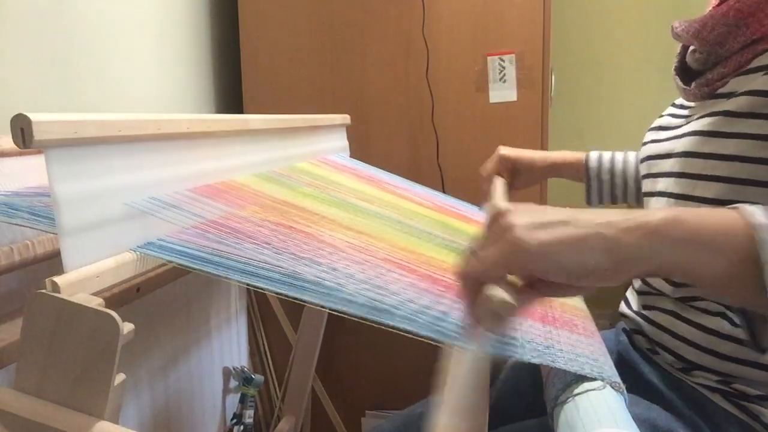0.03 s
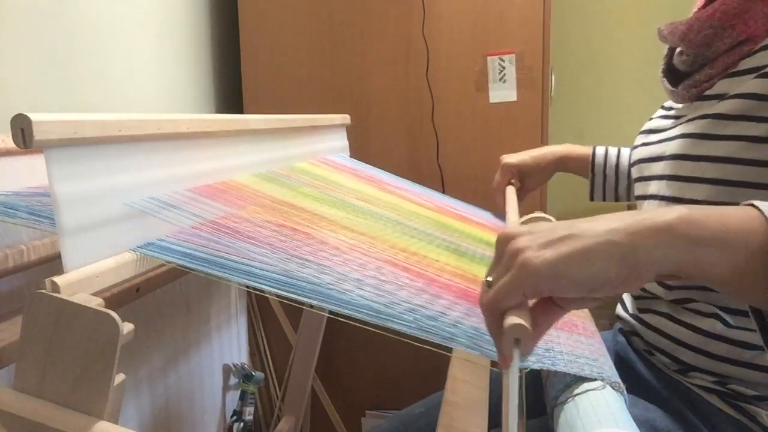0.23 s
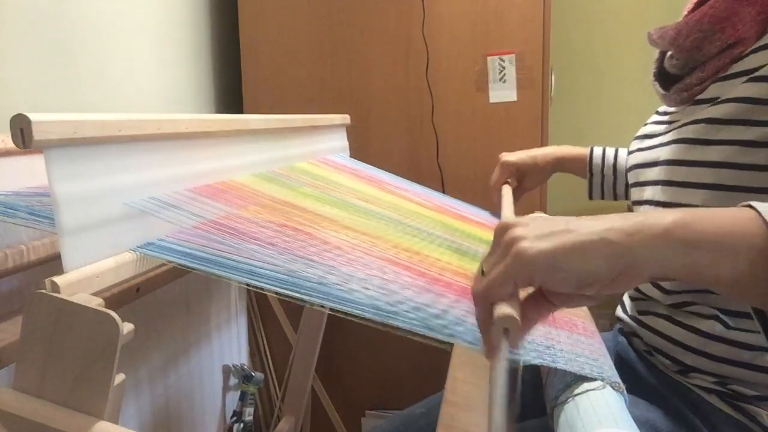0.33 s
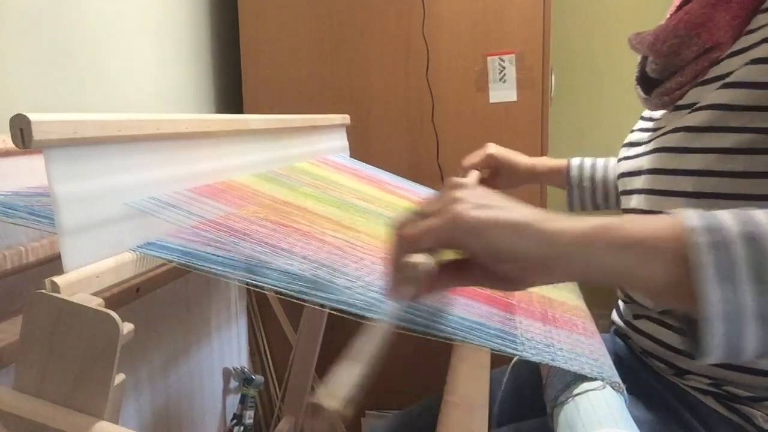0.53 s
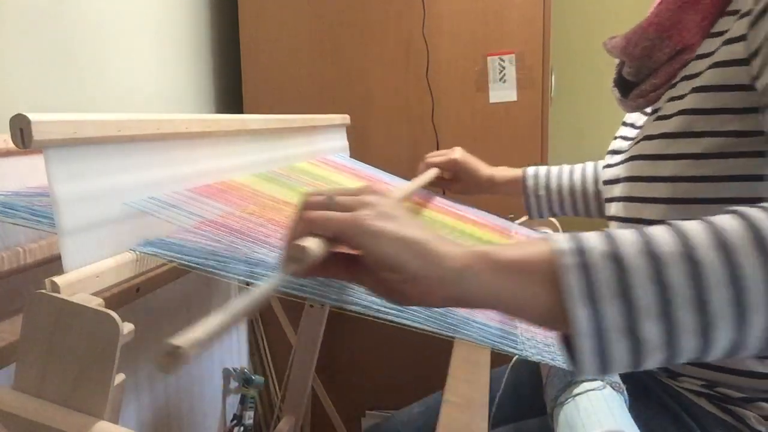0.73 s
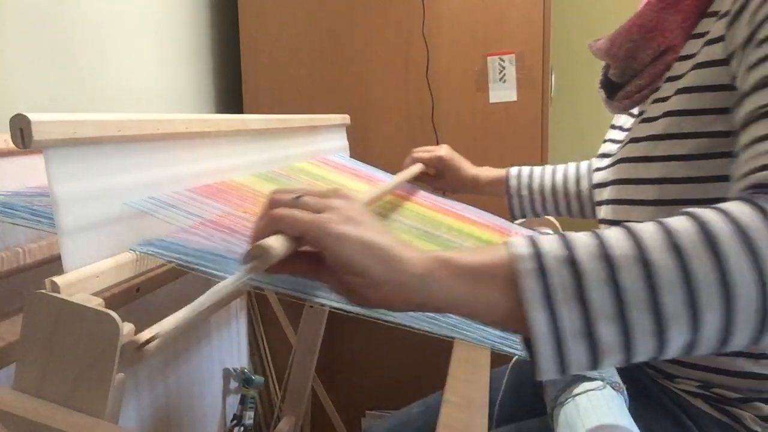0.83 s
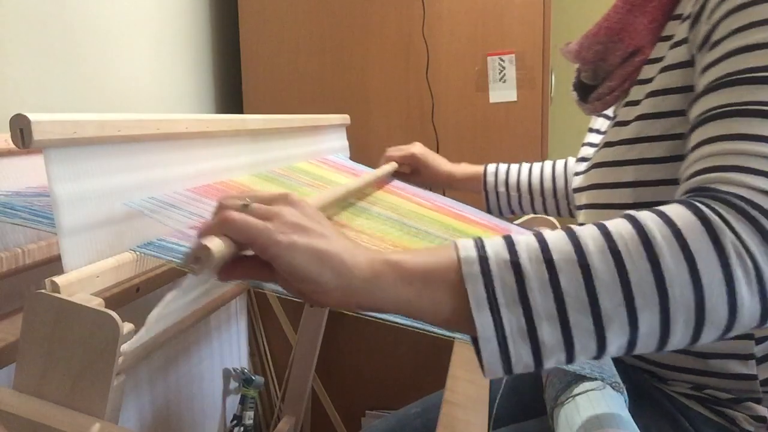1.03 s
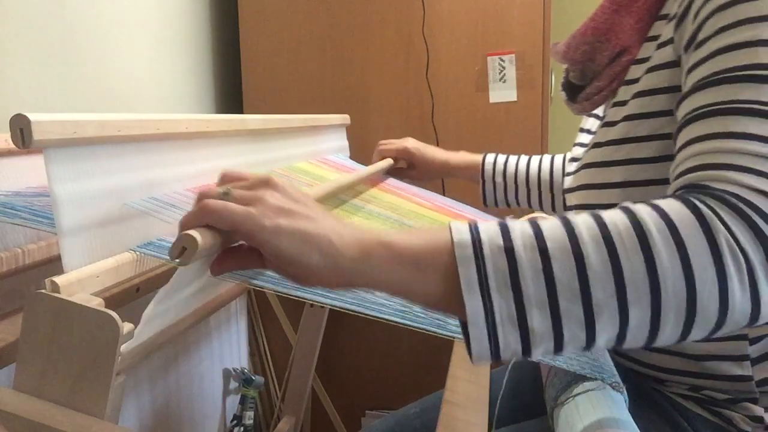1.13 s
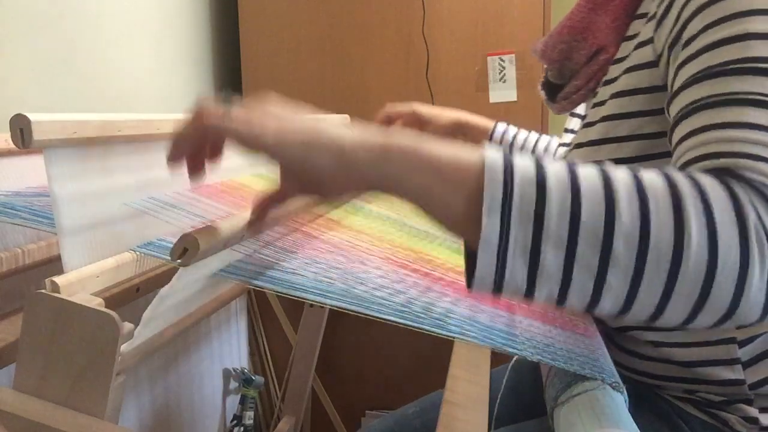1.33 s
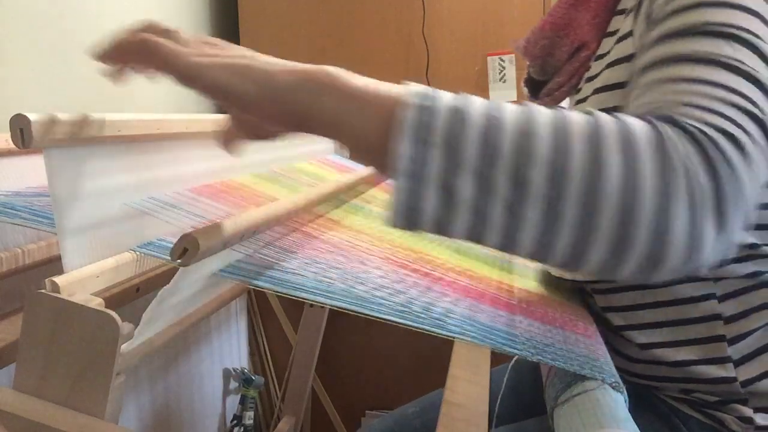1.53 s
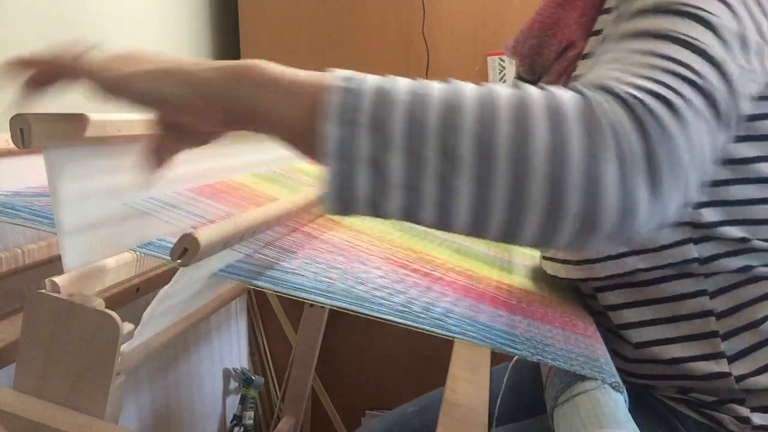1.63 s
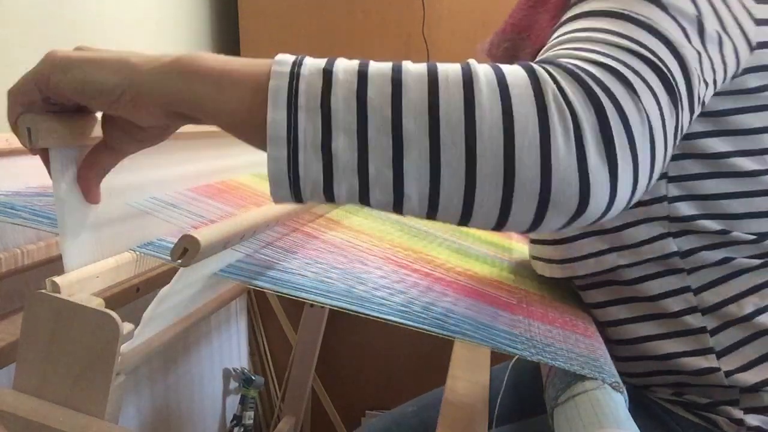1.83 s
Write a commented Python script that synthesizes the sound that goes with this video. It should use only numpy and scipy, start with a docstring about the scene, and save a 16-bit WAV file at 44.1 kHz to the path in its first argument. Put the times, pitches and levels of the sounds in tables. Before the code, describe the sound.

A small wooden loom's reed rubs along threads with a soft, grainy hiss. At about 0.25 seconds it clicks and thumps against the cloth, and the frame booms and rattles. The reed slides back, then knocks several times into its rests from 1 to 1.2 seconds, with faint squeaks and a softer boom. Another faint squeak and two light taps come around 1.7 to 1.9 seconds. The room is quiet.

```python
"""A soft, grainy hiss opens the sound: the reed (the comb) of a small wooden loom rubs along the threads.
Its slats click as it thumps against the cloth, the frame booms and rattles, and the reed slides back.
Its bar knocks into the rests and settles with faint squeaks. One more squeak and two light taps
follow as the hand grips the next bar. The room is quiet, with a short, dull echo."""
import sys
import numpy as np
from scipy import signal
from scipy.io import wavfile

SR = 44100
rng = np.random.default_rng(int(sys.argv[2]) if len(sys.argv) > 2 else 0)


def generate_wav(sig):
    """Save sig (samples, or channels by samples) to the path in sys.argv[1] as 16-bit PCM at SR."""
    pcm = np.round(np.clip(np.atleast_2d(sig).T, -1, 1) * 32767).astype(np.int16)
    wavfile.write(sys.argv[1], SR, pcm)


N = 83790
TIME = np.arange(N) / SR

# Levels are relative. A fade time (T60) is how long a sound takes to fall by 60 dB.
# The reed's slats click. Each row: start in seconds, level in dB.
SLAT_CLICKS = [(0.236, -27.5), (0.2546, -24), (0.2806, -33)]
# The notes the slats ring with. Each row: pitch in Hz, level in dB, fade time in seconds.
SLAT_NOTES = [(6450, -1.5, 0.025), (6180, -4, 0.024), (6560, -5.5, 0.019), (8530, -8.5, 0.014)]
# The noise in a click. Each row: frequency in Hz, level in dB.
CLICK_SPECTRUM = [(1000, -22), (3200, -5), (5000, -8), (6500, 1.5), (8000, -15), (11000, -8.5),
                  (15000, -34.5)]

# Soft blows on the frame. Each row: start in seconds, level in dB.
FRAME_THUMPS = [(0.2364, -48), (0.2631, -32.5), (0.2784, -27), (1.166, -44.5), (1.1976, -51), (1.318, -70)]
# The notes the frame rings with. Each row: pitch in Hz, level in dB, fade time in seconds.
FRAME_NOTES = [(45.2, -42.5, 1.95), (86.4, -21.5, 1.55), (128, -15, 0.23), (238, -16, 1.12),
               (299.5, -6, 0.31), (334.7, -13, 0.66), (381.2, -19, 0.77), (414.3, -5.5, 0.14),
               (463, -22.5, 0.52), (581, -22.5, 0.5), (664, -26, 0.66), (833, -15.5, 0.15)]
# The frame's main note swells. Each row: start in seconds, level in dB, hold in seconds.
FRAME_BOOMS = [(0.267, -28, 0.089), (1.173, -36, 0.01)]
# The frame shudders under load. Each row: start in seconds, level in dB, hold in seconds.
FRAME_SHUDDERS = [(-.02, -54, 0.069), (0.225, -40.5, 0.0067), (0.261, -38.5, 0.085), (1.03, -53, 0.06),
                  (1.141, -43, 0.061), (1.313, -71, 0.015)]
# The noise in a shudder. Each row: frequency in Hz, level in dB.
SHUDDER_SPECTRUM = [(22, 2), (32, -32.5), (50, 6), (85, -9.5), (140, -2), (300, 1.5), (500, -14),
                    (900, -12), (1600, -30), (4000, -52)]

# Wood knocks on wood. Each row: start in seconds, level in dB, treble limit in Hz,
# level of the ringing in dB, fade time of the crack in seconds.
BAR_KNOCKS = [(0.2291, -31, 3500, -13, 0.081), (0.471, -48, 2900, -19, 0.15),
              (0.554, -48.5, 7000, -20, 0.044), (0.9606, -34, 2220, 1, 0.15),
              (1.0098, -37, 2960, -12.5, 0.12), (1.106, -35.5, 3420, 1.5, 0.18),
              (1.1288, -31, 5500, -12, 0.075), (1.1625, -37.5, 4860, -1.5, 0.11)]
# The notes the bar rings with. Each row: pitch in Hz, level in dB, fade time in seconds.
BAR_NOTES = [(166.6, -27, 0.82), (323.4, -11, 0.32), (479, -18, 0.41), (661, -20.5, 0.29), (987, 1.5, 0.12),
             (1059, -9.5, 0.084), (1640, -29, 0.127), (1994, -8.5, 0.11), (2326, -15, 0.047),
             (2995, -31, 0.024)]
# The noise in a knock. Each row: frequency in Hz, level in dB.
KNOCK_SPECTRUM = [(150, -16), (350, -2), (700, -10), (1100, 4), (2200, -3), (3500, -3), (4800, -13),
                  (6000, -7), (7500, -37), (15000, -16.5)]

# The faster the reed slides, the louder it rubs. Each row: time in seconds, level in dB.
RUB_LEVELS = [(0, -56), (.034, -53.5), (.092, -54), (.144, -69.5), (.19, -45.5), (.235, -43), (.29, -43.5),
              (.362, -52), (.422, -77), (.48, -61), (.55, -53.5), (.664, -52.5), (.782, -55), (.938, -62.5),
              (1.0, -57), (1.05, -120)]
# The hiss of the threads. Each row: frequency in Hz, level in dB.
RUB_SPECTRUM = [(60, -19), (160, -3), (260, -4.5), (380, -4), (650, -16), (1300, 1), (2200, 1), (3600, 1.5),
                (5000, -7), (7000, -10.5), (10000, -18), (15000, -19)]
# How bright the hiss is. Each row: time in seconds, treble slope in dB per octave.
RUB_BRIGHTNESS = [(0, -1.5), (.06, 2.5), (.2, 0.5), (.27, 0.5), (.36, -13), (.46, -3.5), (.56, 2), (.68, 0),
                  (.8, -8), (.95, -2)]

# The hand taps. Each row: start in seconds, level in dB, treble limit in Hz, level of the ringing in dB.
HAND_TAPS = [(1.8009, -44.5, 7740, -0.5), (1.8802, -42.5, 3500, -15)]
# The notes the next bar rings with. Each row: pitch in Hz, level in dB, fade time in seconds.
NEXT_BAR_NOTES = [(398, -17, 0.21), (1138, -6, 0.053), (2277, 5.5, 0.023), (2595, -3, 0.033),
                  (3390, -1.5, 0.03), (6100, -17, 0.035)]
# The noise in a tap. Each row: frequency in Hz, level in dB.
TAP_SPECTRUM = [(100, -10), (300, -3.5), (700, -2), (1100, 0.5), (2400, -6), (4500, -3.5), (6000, -2.5),
                (9000, -10.5), (15000, -10)]

# Loose parts chatter after the beat. Each row: start in seconds, level in dB, fade time in seconds.
LOOSE_RATTLES = [(0.249, -45.5, 0.86), (1.167, -39.5, 0.1)]
# Where the rattling wood rings. Each row: pitch in Hz, level in dB, width in Hz.
RATTLE_BANDS = [(570, 0, 94), (845, -3, 170), (1139, 3, 290), (1533, -5.5, 81), (1967, -6, 150)]
# Wood squeaks. Each row: loudest moment in seconds, level in dB, pitch in Hz, width in Hz,
# rise time in seconds, fade time in seconds.
WOOD_SQUEAKS = [(1.016, -64, 7150, 2300, 0.011, 0.16), (1.078, -54, 5850, 2000, 0.017, 0.21),
                (1.066, -71.5, 12000, 2200, 0.028, .25), (1.691, -64, 4170, 400, 0.0064, 0.31)]
# The quiet room's own noise. Each row: frequency in Hz, level in dB.
ROOM_SPECTRUM = [(22, -18.5), (32, -3), (48, 9), (80, 2), (150, -1.5), (300, -5), (600, -5.5), (1050, -1),
                 (1800, -4.5), (2600, -9.5), (4000, -13), (7000, -16), (11000, -23), (15500, -23.5)]


def slat_clicks():
    """The reed meets the cloth and its slats ring with sharp, high clicks."""
    return sum(at(start, from_db(db) * strike(SLAT_NOTES, CLICK_SPECTRUM, ring_db=-3, tick_db=-6,
                                              crack_t60=0.023, damping=0.28, rise_s=0.0004))
               for start, db in SLAT_CLICKS)


def frame_thumps():
    """Each soft blow sets the frame's low notes ringing."""
    return sum(at(start, from_db(db) * ringing(FRAME_NOTES, spread_db=2)) for start, db in FRAME_THUMPS)


def frame_boom():
    """The frame's deep main note sinks a little and dies ever faster as the hands ease off."""
    pitch_hz, sag_hz_per_s, release_s = 223.4, 31.6, 0.13
    phase = 2 * np.pi * np.cumsum(pitch_hz - sag_hz_per_s * TIME) / SR
    tone = np.sin(phase) * swell(rise_s=0.013)
    out = np.zeros(N)
    for start, db, hold in FRAME_BOOMS:
        release = np.exp(-(np.maximum(TIME - hold, 0) / release_s) ** 2)
        out += at(start, from_db(db) * tone * fade(t60=0.5, hold=hold) * release)
    return out


def frame_shudder():
    """The frame rumbles while it is pressed; above a certain pitch the rumble dies sooner."""
    bass_t60, knee_hz = 0.57, 170
    rise = swell(rise_s=0.0033)
    out = np.zeros(N)
    for hz, noise in noise_bands(SHUDDER_SPECTRUM):
        t60 = bass_t60 * min(knee_hz / hz, 1) ** 0.91
        for start, db, hold in FRAME_SHUDDERS:
            out += noise * at(start, from_db(db) * rise * fade(t60, hold))
    return out


def bar_knocks():
    """The bar knocks on the wood; each knock has its own loudness, brightness and ring."""
    out = np.zeros(N)
    for start, db, treble_hz, ring_db, crack_t60 in BAR_KNOCKS:
        knock = strike(BAR_NOTES, KNOCK_SPECTRUM, ring_db, tick_db=-2.5,
                       crack_t60=crack_t60, damping=0.32, rise_s=0.0034)
        out += at(start, from_db(db) * low_pass(knock, treble_hz))
    return out


def thread_rubbing():
    """Threads run through the reed with a fine, grainy hiss."""
    treble_from_hz, trim_db, grain_db = 3700, -1, 0.5
    slope = curve(RUB_BRIGHTNESS)
    hiss = sum(noise * from_db(slope * max(np.log2(hz / treble_from_hz), 0))
               for hz, noise in noise_bands(RUB_SPECTRUM))
    return hiss * from_db(curve(RUB_LEVELS) + trim_db + grain_db * wobble(up_to_hz=460))


def hand_taps():
    """The hand lands lightly on the next bar, which rings briefly."""
    out = np.zeros(N)
    for start, db, treble_hz, ring_db in HAND_TAPS:
        tap = strike(NEXT_BAR_NOTES, TAP_SPECTRUM, ring_db, tick_db=-6,
                     crack_t60=0.19, damping=0.59, rise_s=0.00091)
        out += at(start, from_db(db) * low_pass(tap, treble_hz))
    return out


def loose_rattle():
    """Loose parts chatter unevenly in the wood's middle notes and die away."""
    uneven_db = 1
    wood = sum(from_db(db) * rough_tone(2 * np.pi * hz * TIME, width_hz)
               for hz, db, width_hz in RATTLE_BANDS)
    flicker = from_db(uneven_db * wobble(up_to_hz=53))
    loudness = sum(at(start, from_db(db) * fade(t60)) for start, db, t60 in LOOSE_RATTLES)
    return unit_level(wood) * flicker * loudness


def wood_squeaks():
    """Rubbing wood gives short, rough whistles that slide down in pitch."""
    sag_hz_per_s, sag_s = 7100, 0.1
    out = np.zeros(N)
    for peak_s, db, hz, width_hz, rise_s, t60 in WOOD_SQUEAKS:
        age = TIME - peak_s
        phase = 2 * np.pi * np.cumsum(hz - sag_hz_per_s * np.clip(age, 0, sag_s)) / SR
        rise_and_fall = np.exp(np.minimum(age / rise_s, -np.log(1000) * age / t60))
        out += from_db(db) * rough_tone(phase, width_hz) * rise_and_fall
    return out


def room_echo(sound):
    """The room sends the sound back as a short, dull tail."""
    delay_s, treble_hz, echo_db = 0.005, 6460, -5.5
    tail = at(delay_s, rng.standard_normal(N) * fade(t60=0.23))
    dull_tail = low_pass(tail / np.sqrt(np.sum(tail ** 2)), treble_hz)
    return from_db(echo_db) * signal.fftconvolve(sound, dull_tail)[:N]


def room_noise():
    """The faint, steady hush of the room."""
    return from_db(-70) * sum(noise for hz, noise in noise_bands(ROOM_SPECTRUM))


def strike(notes, spectrum, ring_db, tick_db, crack_t60, damping, rise_s):
    """One hard blow: a tick of contact, a noisy crack, and clear notes that build up."""
    bands = noise_bands(spectrum)
    tick = from_db(tick_db) * sum(noise for hz, noise in bands) * fade(t60=0.0054)
    # crack_t60 holds at 1000 Hz; more damping makes the treble die sooner
    crack = sum(noise * fade(crack_t60 * (1000 / hz) ** damping) for hz, noise in bands)
    ring = from_db(ring_db) * ringing(notes, spread_db=1) * swell(rise_s)
    return tick + from_db(-3) * crack * swell(rise_s=0.0007) + ring


def ringing(notes, spread_db):
    """The fading pure tones of one blow, each struck a little harder or softer by chance."""
    out = np.zeros(N)
    for k, (hz, db, t60) in enumerate(notes):
        gain = (-1) ** k * from_db(db + spread_db * rng.standard_normal())
        out += gain * np.sin(2 * np.pi * hz * TIME) * fade(t60)
    return out


def noise_bands(spectrum):
    """Noise split into third-octave bands, as (Hz, noise) pairs whose sum has a level near 1."""
    edges = np.geomspace(22, 17000, 29)
    centres = np.sqrt(edges[1:] * edges[:-1])
    hz, db = np.transpose(spectrum)
    gains = from_db(np.interp(np.log(centres), np.log(hz), db))
    gains /= np.sqrt(np.sum(gains ** 2 * np.diff(edges)) * 2 / SR)
    white = rng.standard_normal((2, N + SR // 2))
    bands = []
    for k, centre in enumerate(centres):
        band_pass = signal.butter(2, edges[k:k + 2], "band", fs=SR, output="sos")
        bands.append((centre, gains[k] * signal.sosfilt(band_pass, white[k % 2])[-N:]))
    return bands


def rough_tone(phase, width_hz):
    """A tone that wavers at random; the wider it is, the more it sounds like noise."""
    return wobble(width_hz / 2) * np.cos(phase) - wobble(width_hz / 2) * np.sin(phase)


def wobble(up_to_hz):
    """A smooth random wiggle."""
    return unit_level(low_pass(rng.standard_normal(N), up_to_hz))


def swell(rise_s):
    """Rise from 0 towards 1."""
    return 1 - np.exp(-TIME / rise_s)


def fade(t60, hold=0):
    """Hold, then fall by 60 dB every t60 seconds."""
    return np.exp(-np.log(1000) * np.maximum(TIME - hold, 0) / t60) + 1e-18


def at(start, sound):
    """Move a sound to its start time in seconds."""
    return np.interp(np.arange(N) - round(start * SR), np.arange(N), sound, left=0, right=0)


def curve(rows):
    """Join (time, value) points with straight lines."""
    return np.interp(TIME, *np.transpose(rows))


def low_pass(sound, hz):
    """Soften everything above hz."""
    return signal.sosfilt(signal.butter(2, hz, fs=SR, output="sos"), sound)


def unit_level(sound):
    """Scale to an average (rms) level of 1."""
    return sound / np.sqrt(np.mean(sound ** 2) + 1e-20)


def from_db(db):
    """Turn decibels into a multiplier."""
    return 10 ** (np.asarray(db) / 20)


def scene():
    """The loom and the room in one channel; only clicks, knocks, taps and squeaks echo."""
    clicks = slat_clicks()
    wood = bar_knocks() + hand_taps() + wood_squeaks()
    frame = frame_thumps() + frame_boom() + frame_shudder()
    room = room_echo(wood + 0.94 * clicks) + room_noise()
    return (clicks + frame + wood + thread_rubbing() + loose_rattle() + room)[None]


def record(dry):
    """The microphone drops the deepest bass; the very top is cut steeply."""
    low_hz, top_hz = 31.3, 15900
    thinned = signal.sosfilt(signal.butter(4, low_hz, "high", fs=SR, output="sos"), dry)
    return signal.sosfilt(signal.ellip(12, .1, 80, top_hz, fs=SR, output="sos"), thinned)


dry = scene()
out = record(dry)
generate_wav(out)
```